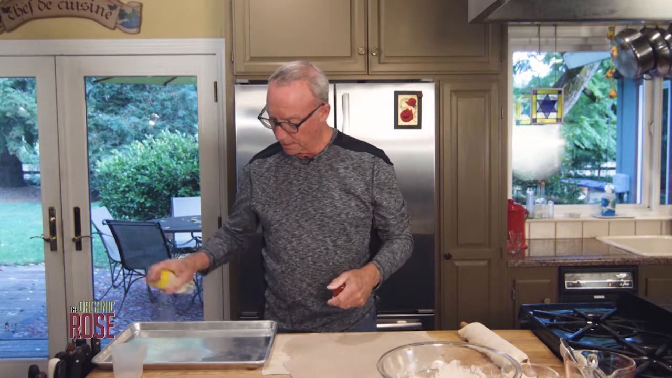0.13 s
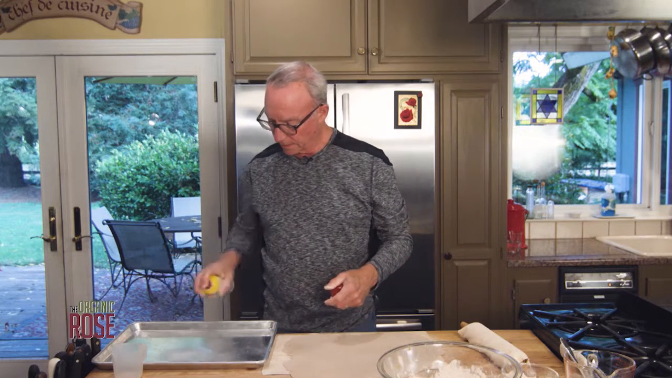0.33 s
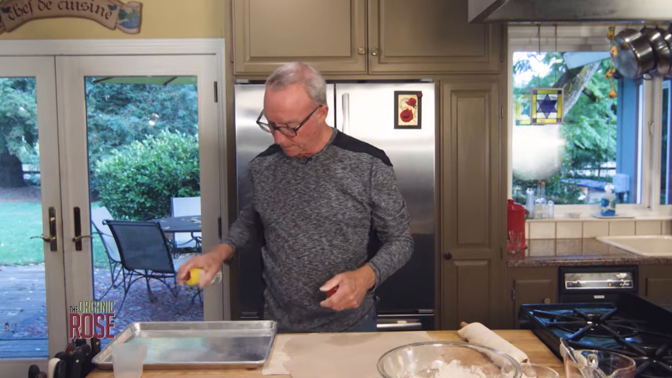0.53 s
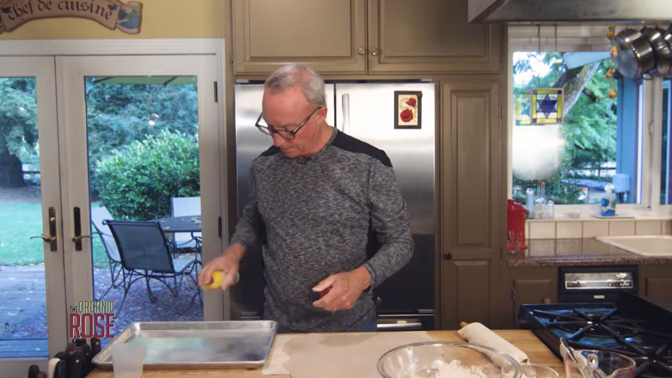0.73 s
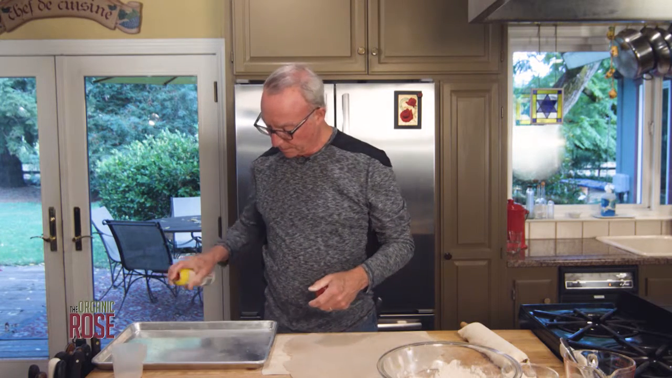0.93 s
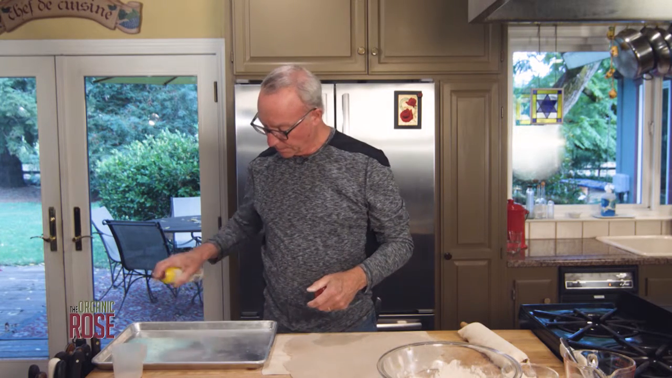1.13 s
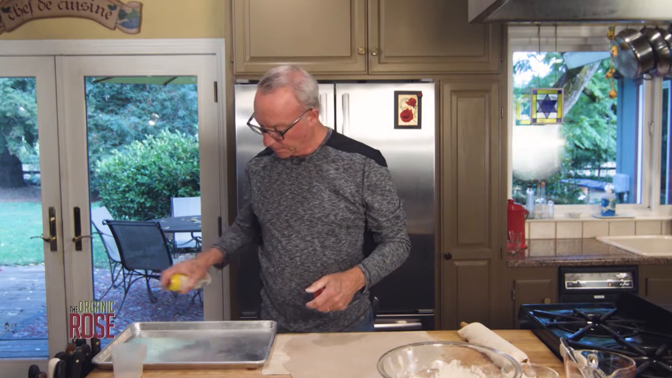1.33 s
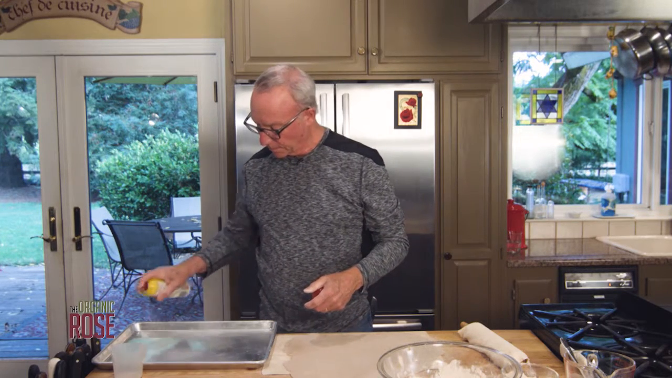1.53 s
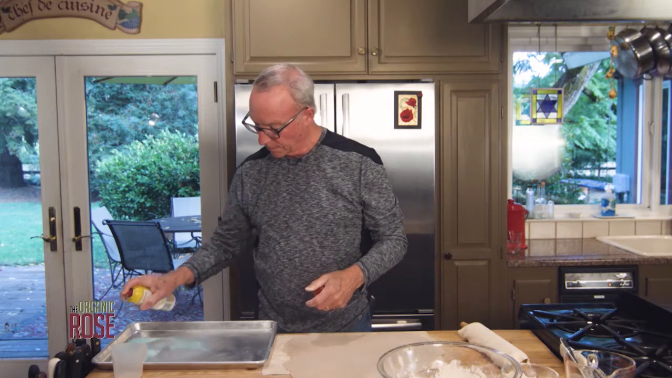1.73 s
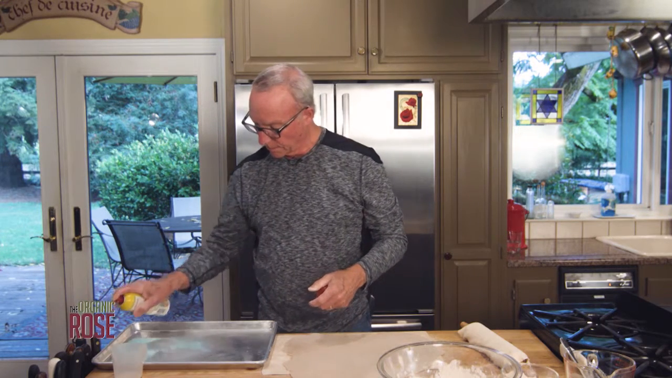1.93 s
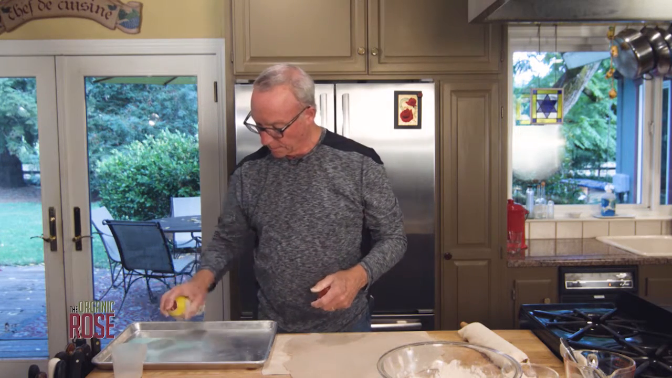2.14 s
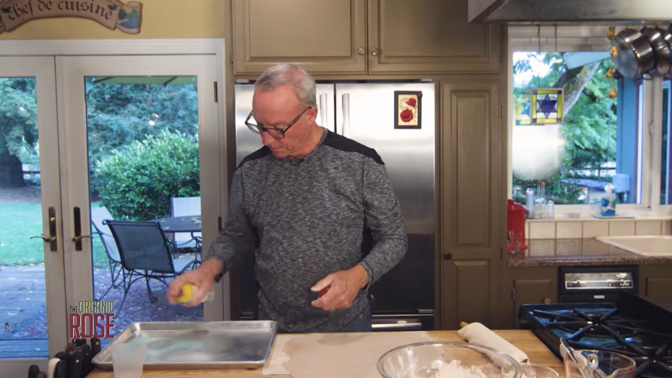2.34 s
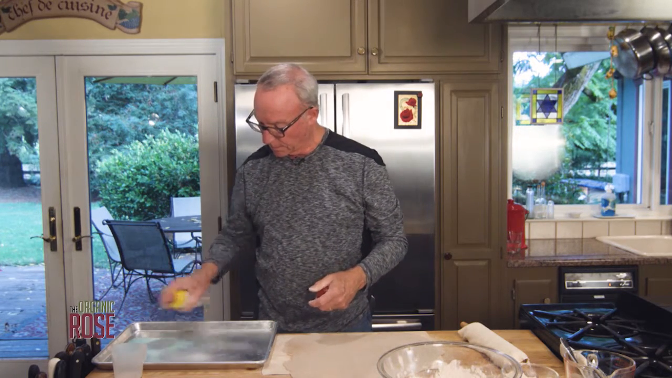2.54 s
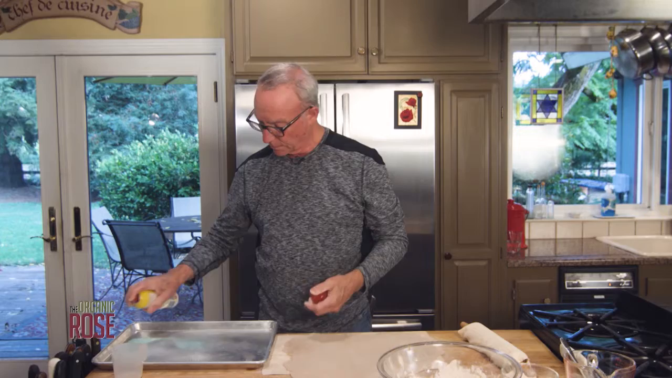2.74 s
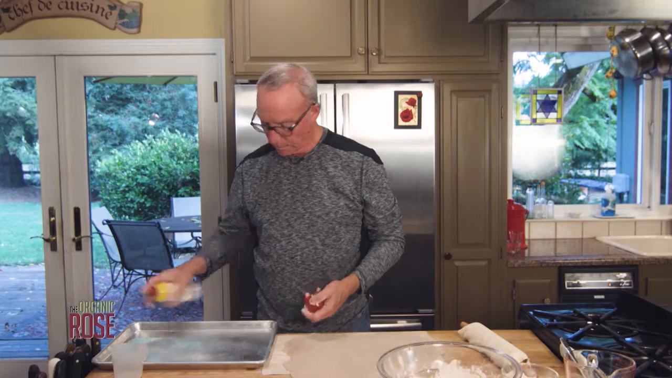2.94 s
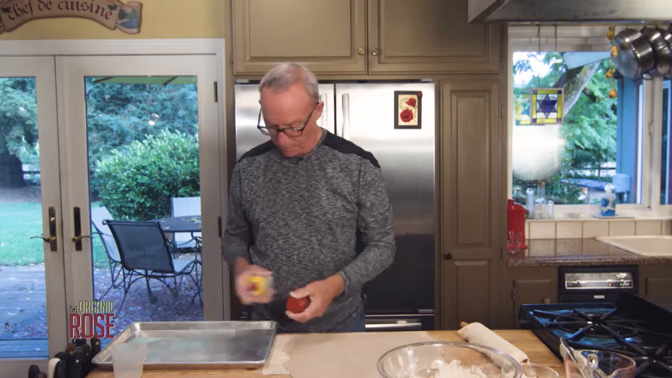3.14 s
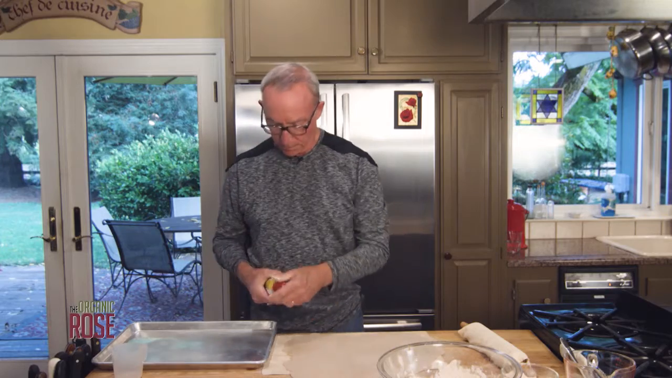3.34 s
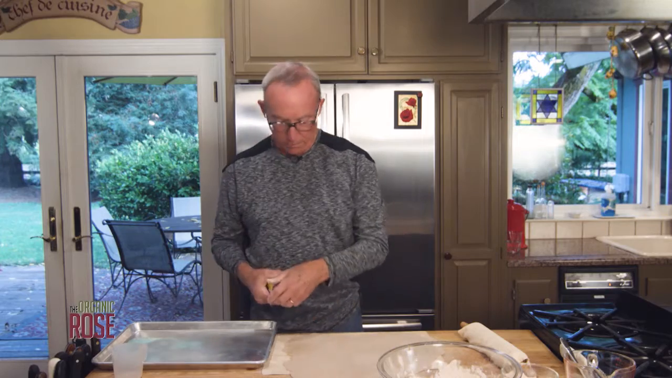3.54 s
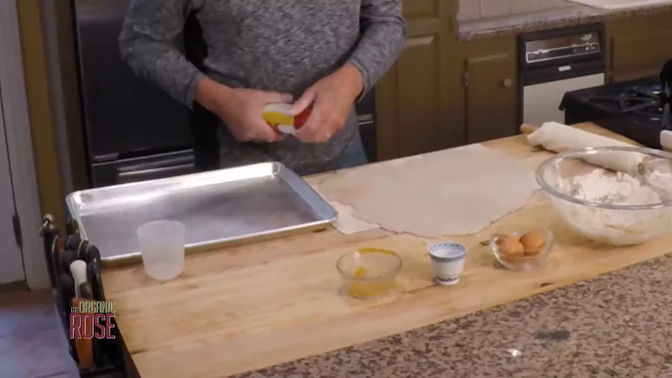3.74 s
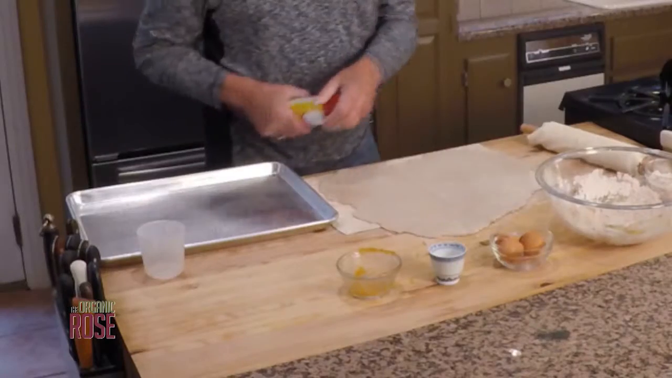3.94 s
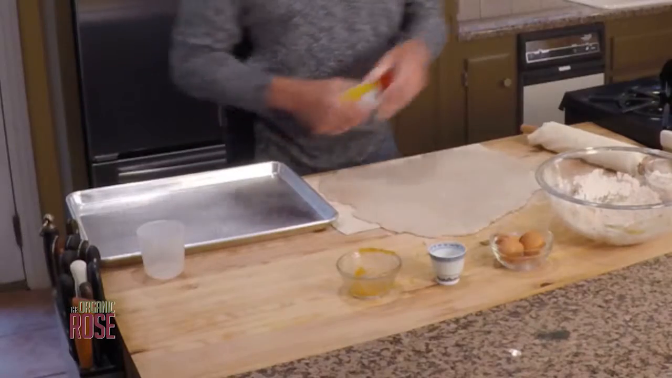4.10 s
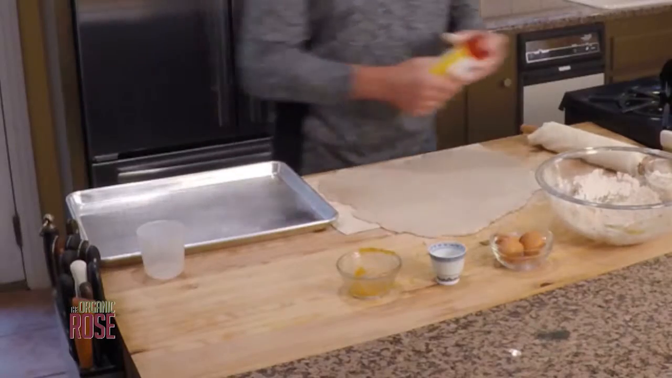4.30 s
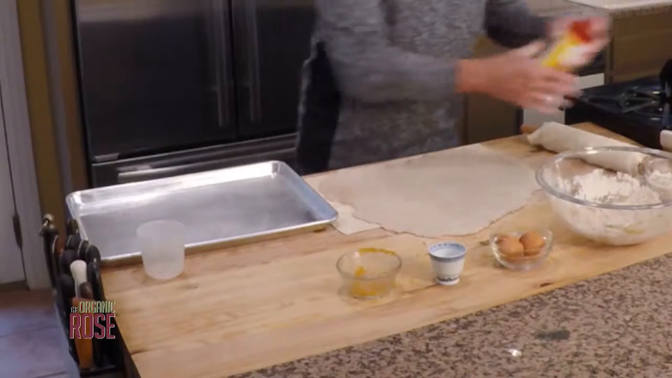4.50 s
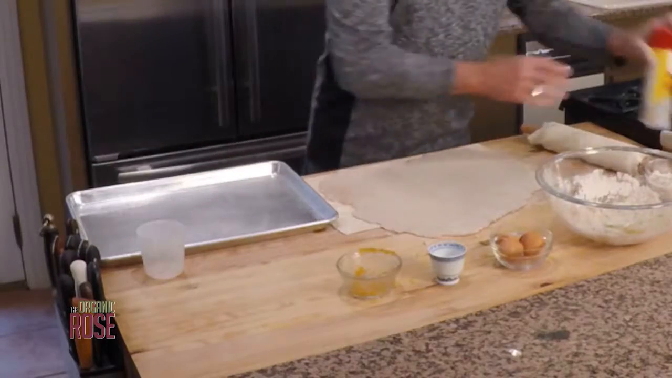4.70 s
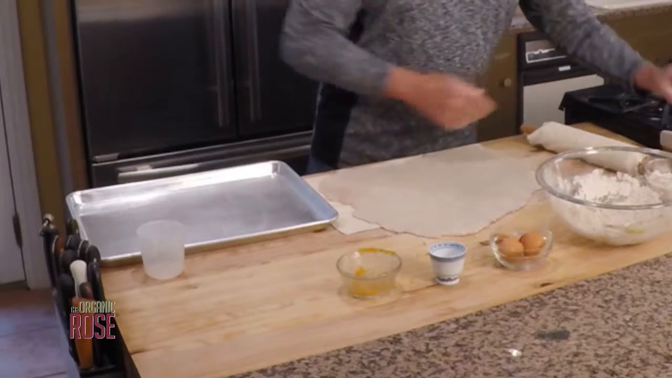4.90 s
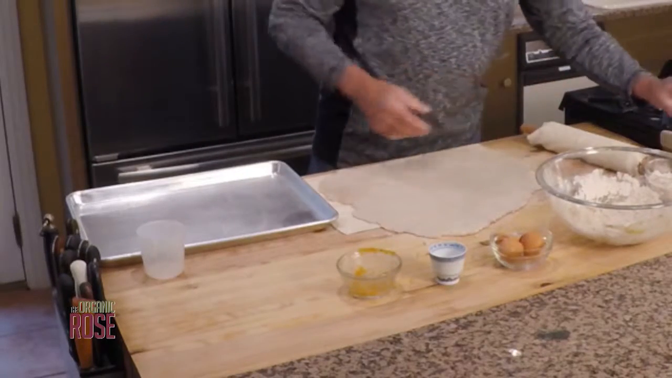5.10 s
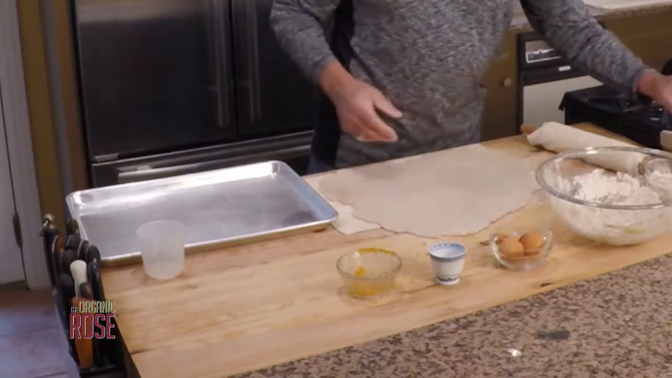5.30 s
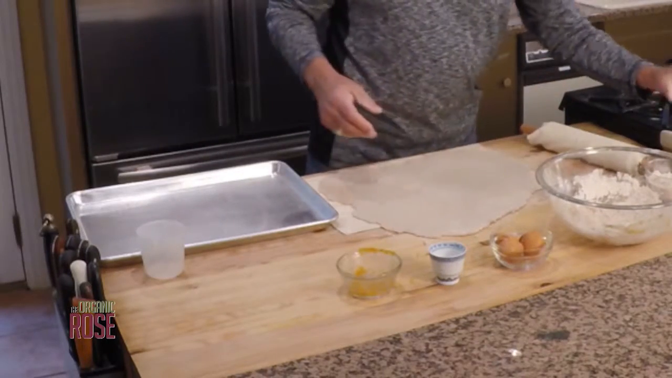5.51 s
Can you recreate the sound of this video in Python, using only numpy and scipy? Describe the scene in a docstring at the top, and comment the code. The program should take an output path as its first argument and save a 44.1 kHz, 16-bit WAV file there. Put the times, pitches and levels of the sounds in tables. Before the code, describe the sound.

Close by in a slightly echoing kitchen, a can of cooking spray gives about ten quick, bright hisses over a metal baking sheet, their tone shifting as the hand moves. The nozzle clicks or spits now and then. The spraying stops, sleeves and fingers rustle faintly, and the plastic cap snaps back on. Finally the can knocks down on the counter and rings faintly.

```python
"""Close by in a live kitchen, a can of cooking spray sweeps over a metal baking sheet in ten quick hisses,
each a jet of gas combed by a near reflection that shifts with the hand. At times the nozzle clicks as it
opens or spits mid-spray; late in the run gas seeps out, then the nozzle whistles once. From 3 s sleeves
and fingers rustle, and at 3.5 s the plastic cap snaps back on. At 5 s the can knocks down on the counter
and rings faintly."""
import sys
import numpy as np
from scipy import signal
from scipy.fft import rfft, irfft, next_fast_len
from scipy.io import wavfile
from scipy.ndimage import map_coordinates

SR = 44100
rng = np.random.default_rng(int(sys.argv[2]) if len(sys.argv) > 2 else 0)


def inscribe(sig):
    """Save sig as 16-bit PCM at rate SR to the path in sys.argv[1].

    A 1-D sig is mono; a 2-D sig holds one channel per row.
    Samples are clipped to [-1, 1] before scaling.
    """
    pcm = np.round(np.clip(np.atleast_2d(sig).T, -1, 1) * 32767)
    wavfile.write(sys.argv[1], SR, pcm.astype(np.int16))


N = 245195
PRE_ROLL = SR // 5   # samples before time zero, so the room is already ringing
TIME = np.arange(-PRE_ROLL, N) / SR
SIZE = len(TIME)


def from_db(db):
    """Decibels to gain."""
    return 10 ** (np.asarray(db) / 20)


def unit_rms(x):
    """Scale to unit power."""
    return x / np.sqrt(np.mean(x ** 2) + 1e-20)


def at_hz(curve, hz):
    """Read a curve on a log-frequency axis."""
    freqs, values = np.array(curve).T
    return np.interp(np.log(hz + 1e-9), np.log(freqs), values)


def noise(colour_db, size):
    """Unit-power noise shaped by an EQ curve, given as a function of frequency."""
    padded = next_fast_len(size)
    hz = np.arange(padded // 2 + 1) * SR / padded
    spectrum = rfft(rng.standard_normal(padded)) * from_db(colour_db(hz))
    return unit_rms(irfft(spectrum, padded)[:size])


def waver(rate_hz, size):
    """A smooth random modulator of unit power."""
    return noise(lambda hz: -20 * np.log10(1 + (hz / rate_hz) ** 2), size)


def butter(x, order, hz, kind="low"):
    """Butterworth filter."""
    return signal.sosfilt(signal.butter(order, hz, kind, fs=SR, output="sos"), x + 1e-18)


def add(track, start_s, sound):
    """Mix a sound in at its cue."""
    i = max(PRE_ROLL + round(start_s * SR), 0)
    track[i:i + len(sound)] += sound[:SIZE - i]


def ring(hz, t60):
    """One second of a struck mode."""
    t = np.arange(SR) / SR
    return np.sin(2 * np.pi * hz * t) * from_db(-60 * t / t60)


def burst(centre_hz, octaves, t60):
    """A tenth of a second of decaying noise, reaching `octaves` either side of its centre."""
    t = np.arange(SR // 10) / SR
    edges_hz = [centre_hz / 2 ** octaves, min(centre_hz * 2 ** octaves, 0.45 * SR)]
    grit = butter(rng.standard_normal(len(t)), 2, edges_hz, "band")
    return unit_rms(grit) * from_db(-60 * t / t60)


# Colour of the noise floor: (frequency [Hz], relative level [dB])
ROOM_TONE_EQ = [(10, -11), (25, -11.5), (50, -10.5), (85, -13.5), (190, -20), (280, -21.5), (365, -18),
                (460, -23.5), (1100, -25), (2400, -29), (5500, -30), (12300, -29.5), (15800, -31)]


def room_tone(level_db=-65):
    """A steady bed of room tone and microphone hiss."""
    return from_db(level_db) * noise(lambda hz: at_hz(ROOM_TONE_EQ, hz), SIZE)


# Bright base colour of the jet: (frequency [Hz], relative level [dB])
JET_EQ = [(150, -21), (250, -17.5), (606, -17.5), (696, -14.5), (799, -18.5), (1230, -12.5), (1870, -13.5),
          (2690, -10), (3810, -6), (4380, -8), (7240, -5.5), (9550, -3), (14500, -1.5), (15800, -0.5)]
# Nozzle presses; the first leaves only its tail at time zero: (open [s], shut [s], level [dB],
# EQ peak [Hz], peak boost [dB], echo lag [ms], lag drift [ms/s], echo gain [0-1])
PRESSES = [(-.14, -0.01, -38, 11300, 10, 0.75, 0, .15), (0.133, 0.299, -36.5, 11700, 5, 0.86, -0.58, 0.4),
           (.452, .562, -34.5, 9600, 7, 0.71, 0.29, 0.22), (.728, 0.857, -36, 9800, 2, 0.96, -1.6, 0.1),
           (1.037, 1.154, -39.5, 9900, 3.5, 0.95, 0.29, 0.1), (1.287, 1.406, -38.5, 9900, 3, 0.74, 2, 0.1),
           (1.56, 1.676, -39.5, 12000, 2, 0.65, -0.64, 0.35),
           (1.816, 1.938, -39.3, 12900, 2, 0.65, -0.69, .42),
           (2.129, 2.169, -46.5, 13600, 8, 0.55, -0.96, 0.5),
           (2.175, 2.325, -34, 12500, 5, 0.61, -0.73, 0.2), (2.535, 2.639, -33, 11800, 5, .62, -0.89, .4),
           (2.779, 2.892, -36.5, 13300, 4.5, 0.55, -0.76, 0.6)]


def spray(attack_s=0.014, release_s=0.01, first_flow=0.36, sag_db_per_s=15.5, spill_cap_db=-39.5):
    """A turbulent jet gated by the valve: returns the beam at the microphone and the room spill."""
    beam, spill = np.zeros((2, SIZE))
    t = np.arange(SR // 3) / SR
    for start, stop, jet_db, peak_hz, boost_db, lag_ms, drift, echo_gain in PRESSES:
        held_s = np.minimum(t, stop - start)
        # brighter when aimed at the microphone, duller at the sweep's far end, where the lag is long
        treble_db = 0.44 * (jet_db + 38) - 1.5 * (lag_ms - 0.51)
        jet = aimed_jet(peak_hz, boost_db, treble_db, len(t))
        # the nearest reflection makes a comb filter that slides with the hand
        jet = jet + echo_gain * delayed(jet, t, (lag_ms + drift * held_s) / 1000)
        jet = unit_rms(near_echoes(jet, t))
        # part of the flow escapes the instant the seal breaks
        opening = 1 - (1 - first_flow) * np.exp(-t / attack_s)
        valve = opening * np.exp(-(t - held_s) / release_s)
        level_db = jet_db - sag_db_per_s * held_s
        sputter_db = 0.1 * waver(rate_hz=90, size=len(t))
        add(beam, start, jet * valve * from_db(level_db + sputter_db))
        wash = noise(lambda hz: at_hz(JET_EQ, hz), len(t))
        add(spill, start, wash * valve * from_db(np.minimum(level_db, spill_cap_db)))
    return beam, spill


def aimed_jet(peak_hz, boost_db, treble_db, size, width_hz=1900, treble_hz=13000):
    """The nozzle's aim colours the hiss with a bell boost and a treble tilt."""
    def colour_db(hz):
        bell = np.exp(-((hz - peak_hz) / width_hz) ** 2)
        return at_hz(JET_EQ, hz) + boost_db * bell + treble_db * (hz / treble_hz) ** 2
    return noise(colour_db, size)


def delayed(x, t, lag_s):
    """A gliding delay tap: one reflection on a changing path."""
    return map_coordinates(x, [(t - lag_s) * SR], order=3)


def near_echoes(x, t, gain=0.22, shrink_per_s=0.48):
    """Sheet, counter and body throw back short echoes whose paths shorten as the hand moves."""
    lags_s = rng.uniform(0.0011, 0.004, 4)
    return x + gain * sum(delayed(x, t, lag_s * (1 - shrink_per_s * t)) for lag_s in lags_s)


def gas_puffs(trim_db=-5, decay_s=0.0337, suction=0.29, smooth_hz=50):
    """Sub layer of each press: a slow pressure bump, then the running jet draws air along."""
    out = np.zeros(SIZE)
    for start, stop, jet_db, *_ in PRESSES:
        t = np.arange(round((stop - start + decay_s) * SR)) / SR
        add(out, start, from_db(jet_db + trim_db) * (np.exp(-t / decay_s) - suction))
    return butter(out, 2, smooth_hz)


# Opening clicks and mid-spray spits of the nozzle: (time [s], level [dB])
CLICKS_AND_SPITS = [(0.456, -40), (0.464, -39), (0.838, -41), (1.048, -39.5), (1.826, -46), (2.181, -38.5),
                    (2.297, -38), (2.781, -37.5)]


def nozzle_clicks():
    """The nozzle clicks as it opens or spits mid-spray: a dead click over a tiny thud."""
    out = np.zeros(SIZE)
    click = from_db(-2) * ring(hz=1100, t60=0.0052)
    thud = ring(hz=230, t60=0.0034)
    for start, level_db in CLICKS_AND_SPITS:
        add(out, start, -from_db(level_db) * (click + thud))
    return out


# Soft bumps of the body: (time [s], level [dB])
BODY_BUMPS = [(2.04, -54.5), (3.282, -54), (3.743, -53), (4.031, -49), (4.349, -55), (4.445, -51),
              (4.578, -50.5), (5.099, -42), (5.16, -46.5)]


def body_bumps():
    """Each soft bump sounds one low, damped mode."""
    out = np.zeros(SIZE)
    for start, level_db in BODY_BUMPS:
        add(out, start, from_db(level_db) * ring(hz=109, t60=0.041))
    return out


# Fingers touch the can: (time [s], level [dB], centre [Hz])
FINGER_TICKS = [(2.09, -52, 13500), (3.153, -58.5, 2900), (3.253, -55, 11400), (3.337, -58, 11200),
                (3.359, -59, 3200), (3.602, -50, 10500), (4.213, -53, 2580), (4.433, -53, 5600),
                (4.74, -59, 11000)]


def finger_ticks():
    """Light finger contacts give thin, dry ticks of noise."""
    out = np.zeros(SIZE)
    for start, level_db, hz in FINGER_TICKS:
        add(out, start, from_db(level_db) * burst(hz, octaves=0.3, t60=0.023))
    return out


def gas_seep(start_s=2.092, length_s=0.057, level_db=-62.5):
    """A breath of gas seeps out while the finger hesitates."""
    out = np.zeros(SIZE)
    breath = burst(centre_hz=4200, octaves=0.95, t60=0.91)[:round(length_s * SR)]
    add(out, start_s, from_db(level_db) * breath)
    return out


def nozzle_whistle(start_s=2.535, level_db=-38.5):
    """The nozzle whistles once as it opens: a very narrow band of noise."""
    out = np.zeros(SIZE)
    add(out, start_s, from_db(level_db) * burst(centre_hz=8000, octaves=0.07, t60=0.034))
    return out


# Colour of sliding cloth and skin: (frequency [Hz], relative level [dB])
RUSTLE_EQ = [(150, 3), (370, 7.5), (900, -8), (1700, -3), (2250, -0.5), (2650, 1), (3200, -6.5), (4200, -8),
             (6500, -1), (8500, -3.5), (13000, -4), (16000, -15.5)]
# Strokes of sleeves and fingers: (start [s], length [s], peak level [dB])
STROKES = [(3.249, 0.023, -62), (3.588, 0.21, -65), (4.136, 0.097, -61.5), (4.247, 0.086, -59)]


def rustle(swell_db=14, release_s=0.0073, fidget_s=(3.08, 4.8), fidget_db=-72.5):
    """Cloth and skin slide: a few strokes swell and let go over faint, uneven fidgeting."""
    t = np.arange(SR // 2) / SR
    fidgeting = (TIME > fidget_s[0]) * (TIME < fidget_s[1])
    flutter_db = 4 * waver(rate_hz=8, size=SIZE)
    envelope = fidgeting * from_db(fidget_db + flutter_db)
    for start, length, peak_db in STROKES:
        rise_db = swell_db * np.minimum(t / length - 1, 0)
        release = np.exp(-np.maximum(t - length, 0) / release_s)
        add(envelope, start, from_db(peak_db + rise_db) * release)
    return envelope * noise(lambda hz: at_hz(RUSTLE_EQ, hz), SIZE)


def knocks(hits, modes, crack_hz, crack_t60, hollow_hz, top_hz):
    """Contacts crack and ring a body: blunt ones favour its hollow low modes, a firm grip damps it."""
    out = np.zeros(SIZE)
    for start, hit_db, hollow_db, crack_db, decay_scale in hits:
        for k, (hz, mode_db, t60) in enumerate(modes):
            gain = from_db(hit_db + mode_db + hollow_db * (hz < hollow_hz))
            add(out, start, (-1) ** k * gain * ring(hz, t60 * decay_scale))
        add(out, start, from_db(crack_db) * burst(crack_hz, octaves=1.2, t60=crack_t60))
    # the contact takes a moment, which rounds off the very top
    return butter(out, 8, top_hz)


def thumps(hits, trim_db):
    """Sub layer of each knock: a deep push of air in step with its strength."""
    out = np.zeros(SIZE)
    for start, hit_db, *_ in hits:
        add(out, start, from_db(hit_db + trim_db) * ring(hz=36, t60=0.054))
    return out


# Snaps of the cap: (time [s], level [dB], low-mode gain [dB], crack level [dB], decay scale [x])
CAP_HITS = [(3.4866, -31.5, -3, -46, 1.2), (3.50849, -32.5, -1.3, -47, 3.2),
            (3.51093, -26.4, -4, -60, 0.34), (3.51327, -25.5, 11.5, -35.5, 0.74),
            (3.52519, -14, -7.5, -46, 0.69), (3.52744, -20, 11.5, -29.5, 0.21)]
# Resonances of the plastic cap on the can: (frequency [Hz], relative level [dB], t60 [s])
CAP_RESONANCES = [(193, -8.5, 0.0033), (335, -28.5, 0.061), (529, -17.5, 0.039), (742, -25.5, 0.27),
                  (1094, -2, 0.019), (1215, -0.5, 0.012), (1550, -9, 0.023), (2025, -8, 0.016),
                  (2440, -8.5, 0.021), (2890, -4, 0.018), (3075, -3.5, 0.037), (3374, -7, 0.021),
                  (4170, -16.5, 0.012), (5270, -21.5, 0.0077), (6030, -27, 0.043), (3070, -27, 0.3)]


def cap_snap():
    """The cap's lip slips over the rim in a tight cluster of hollow plastic snaps."""
    return knocks(CAP_HITS, CAP_RESONANCES, crack_hz=7640, crack_t60=0.012, hollow_hz=2200, top_hz=12800)


# Can meets counter: (time [s], level [dB], low-mode gain [dB], crack level [dB], decay scale [x])
CAN_HITS = [(5.05629, -21.5, 1, -46.5, 1.34), (5.05928, -29.5, -7, -63, 0.46),
            (5.06429, -26.5, 2, -55, 0.5)]
# Resonances of the can on the counter: (frequency [Hz], relative level [dB], t60 [s])
CAN_RESONANCES = [(85.4, -35, 0.5), (139, -24.5, 0.17), (280, -10, 0.016), (378, -12.5, 0.065),
                  (500, -4, 0.032), (664, -2, 0.045), (755, -23.5, 0.28), (824, -1, 0.0076),
                  (1007, -10.5, 0.042), (1180, -10.5, 0.058), (1320, -15, 0.041), (1558, -8, 0.039),
                  (1815, -16.5, 0.044), (1930, -14, 0.047), (2120, -7, 0.0052), (2760, -22, 0.022),
                  (4750, -21.5, 0.0098), (5500, -25, 0.015), (505, -25, 0.47), (627, -32, 0.56),
                  (885, -30.5, 0.35), (1190, -31.5, 0.66)]


def can_landing():
    """The can lands and rocks flat: a short knock with a few faint, long rings."""
    return knocks(CAN_HITS, CAN_RESONANCES, crack_hz=4400, crack_t60=0.019, hollow_hz=900, top_hz=13000)


# Decay of the kitchen: (frequency [Hz], t60 [s])
REVERB_DECAY = [(100, 0.5), (500, 0.58), (1200, 0.6), (3000, 0.42), (7000, .5), (11000, 0.28), (16000, 0.5)]
# Reverb return against its send: (frequency [Hz], level [dB])
REVERB_EQ = [(100, -4), (500, -4), (1200, -3.5), (3000, -9), (7000, -2.5), (16000, -13)]


def kitchen_reverb(send, predelay_s=0.0012, build_s=0.0027):
    """Diffuse reflections build up after a short gap and die away band by band."""
    t = np.arange(SR) / SR
    onset = np.clip((t - predelay_s) / build_s, 0, 1)
    tail = np.zeros(SR)
    edges_hz = np.geomspace(60, 18000, 13)
    for low, high in zip(edges_hz, edges_hz[1:]):
        hz = np.sqrt(low * high)
        fade = onset * from_db(-60 * t / at_hz(REVERB_DECAY, hz))
        band = butter(rng.standard_normal(SR), 2, [low, high], "band")
        tail += band * fade / np.linalg.norm(fade) * from_db(at_hz(REVERB_EQ, hz))
    return signal.fftconvolve(send, tail)[:SIZE]


def scene():
    """Mono mix: spray, cap, can and hands each have a reverb send; the subs and room tone stay dry."""
    beam, spill = spray()
    hiss = beam + gas_seep() + nozzle_whistle()
    hands = nozzle_clicks() + body_bumps() + finger_ticks() + rustle()
    cap = cap_snap()
    can = can_landing()
    subs = gas_puffs() + thumps(CAP_HITS, trim_db=-27.5) + thumps(CAN_HITS, trim_db=-17)
    send = from_db(-1.5) * spill + from_db(-11) * hiss + from_db(-5.5) * cap + from_db(-4) * (hands + can)
    mix = room_tone() + hiss + hands + cap + can + subs + kitchen_reverb(send)
    return mix[None, PRE_ROLL:]


def record(dry, low_cut_hz=3.4, high_cut_hz=15750, dc_offset=-0.0013):
    """Master chain: a subsonic low cut, a steep high cut and a slight DC offset."""
    high_cut = signal.ellip(10, 0.2, 70, high_cut_hz, fs=SR, output="sos")
    return signal.sosfilt(high_cut, butter(dry, 1, low_cut_hz, "high")) + dc_offset


dry = scene()
out = record(dry)
inscribe(out)
```